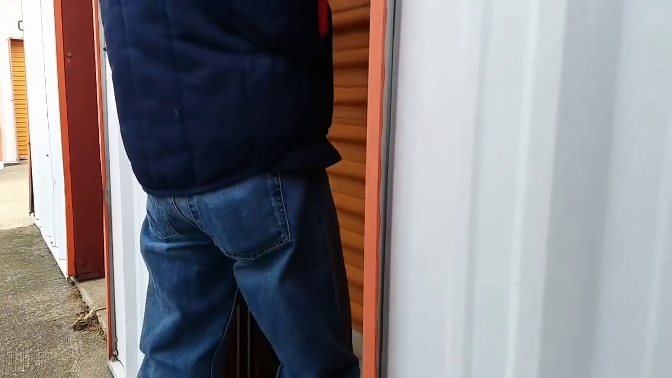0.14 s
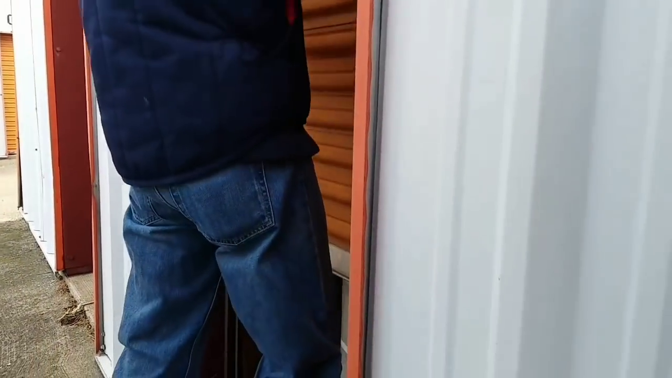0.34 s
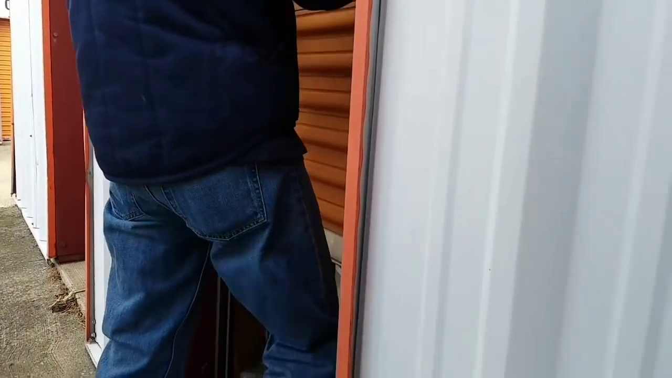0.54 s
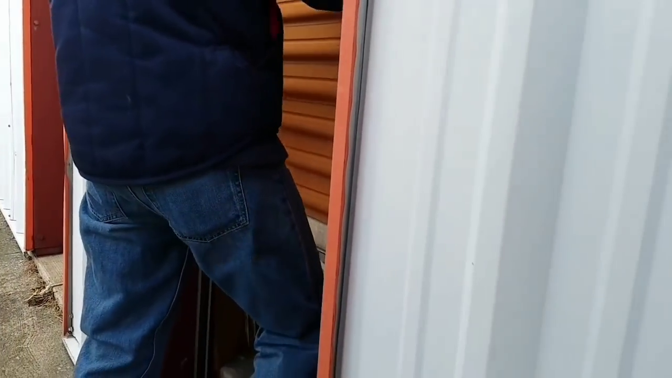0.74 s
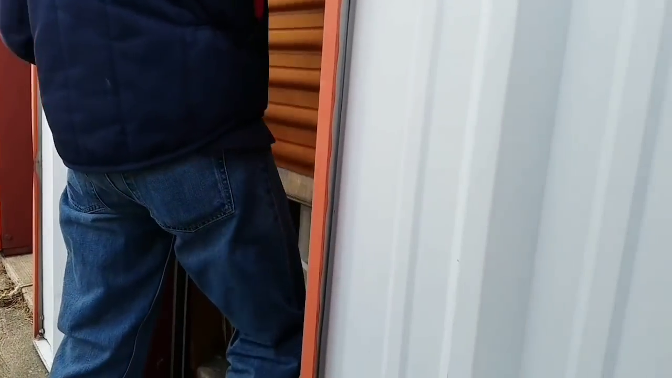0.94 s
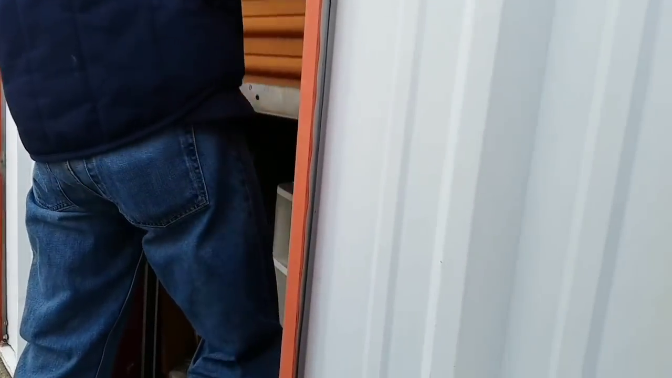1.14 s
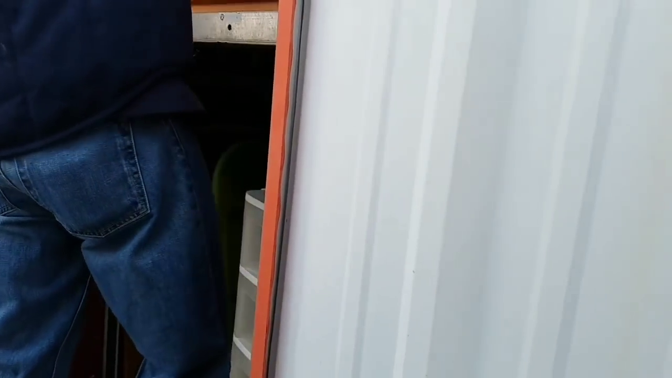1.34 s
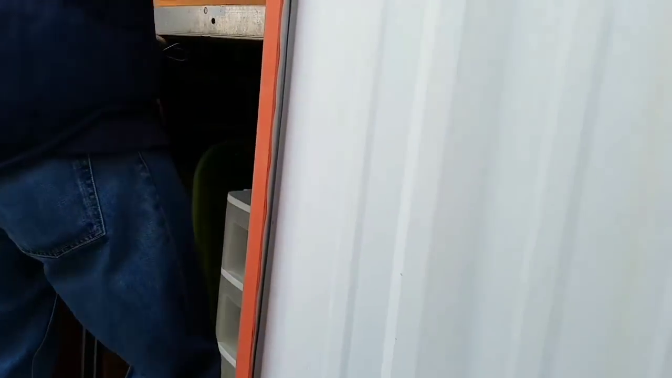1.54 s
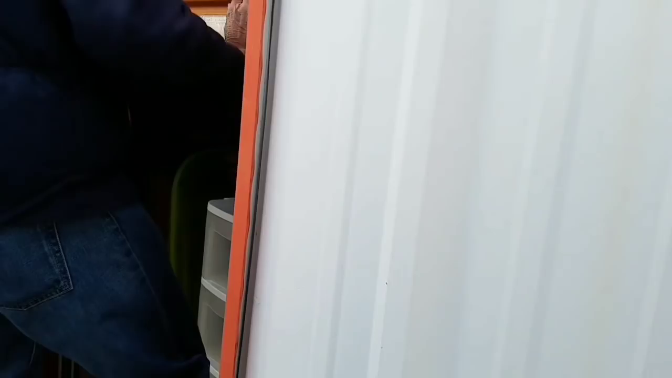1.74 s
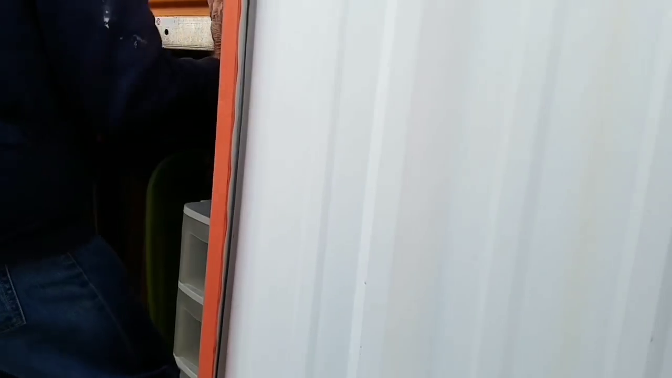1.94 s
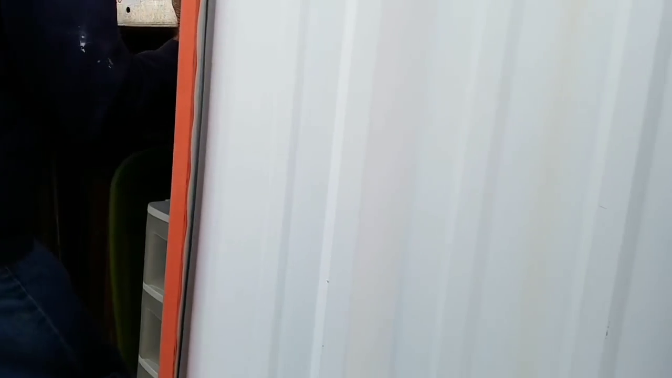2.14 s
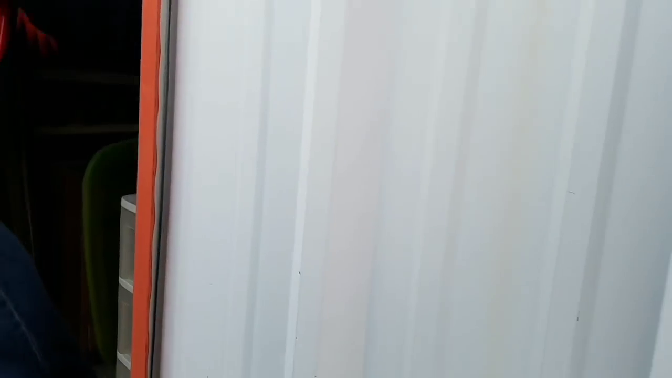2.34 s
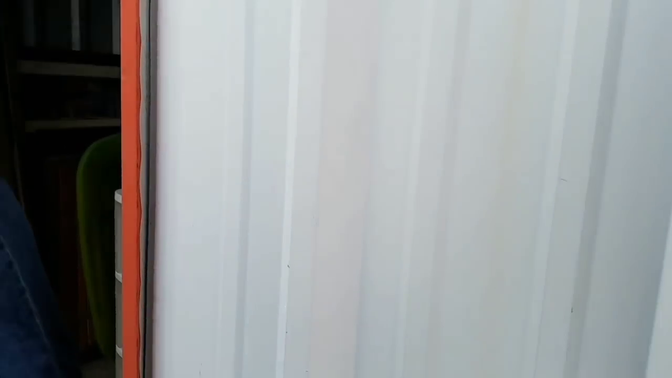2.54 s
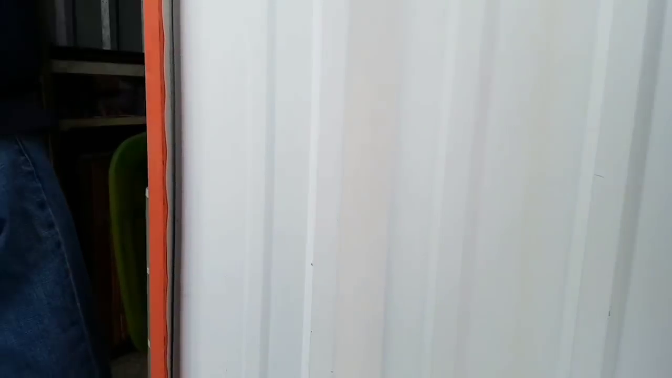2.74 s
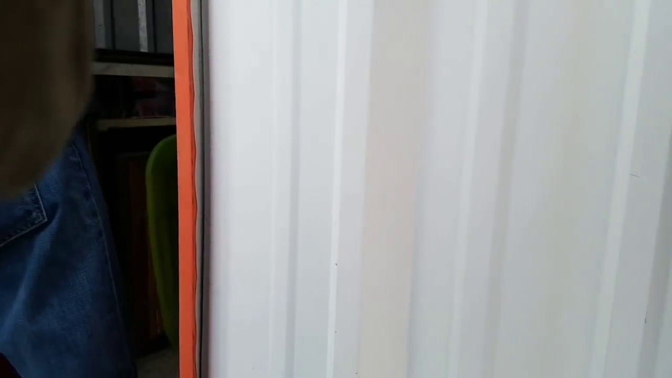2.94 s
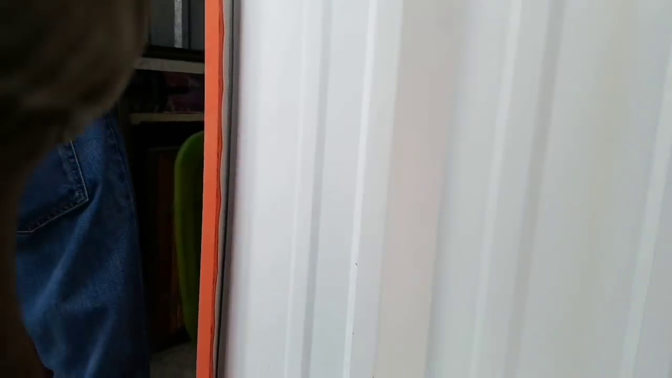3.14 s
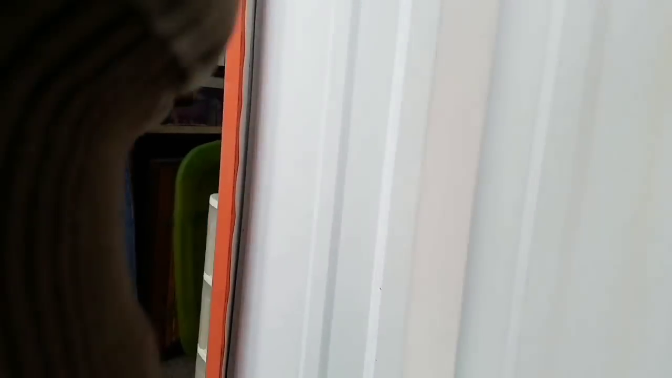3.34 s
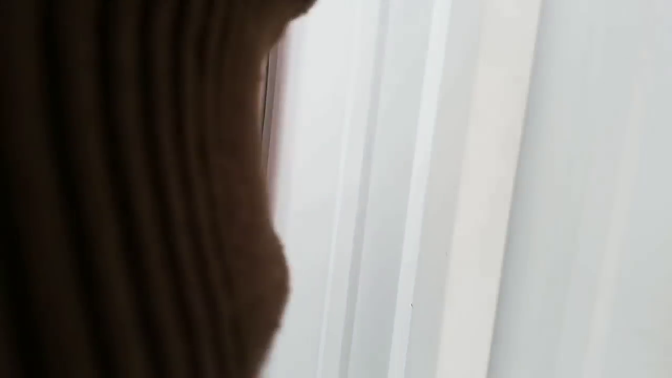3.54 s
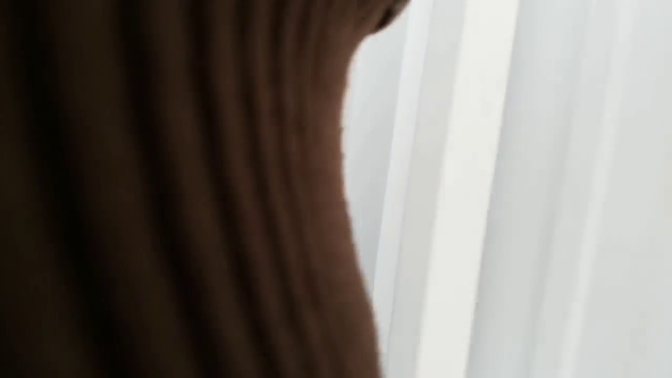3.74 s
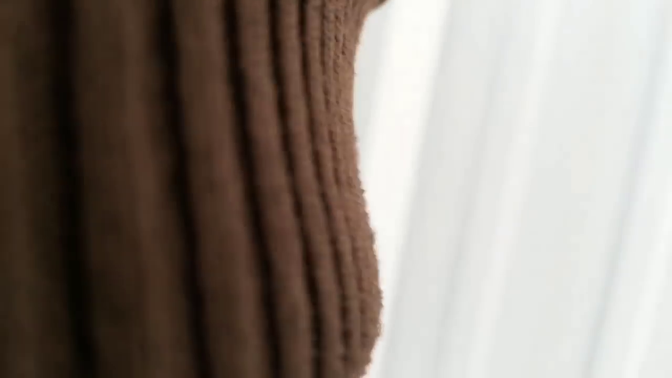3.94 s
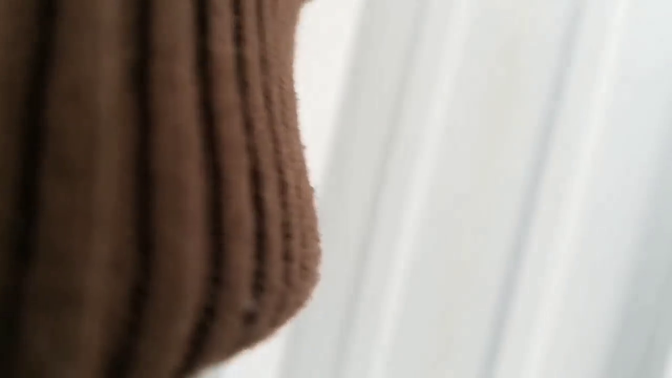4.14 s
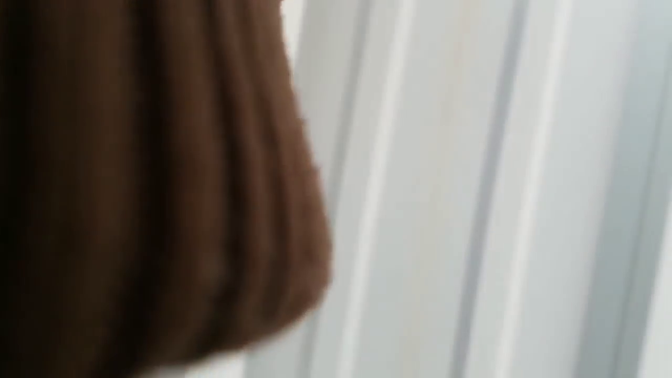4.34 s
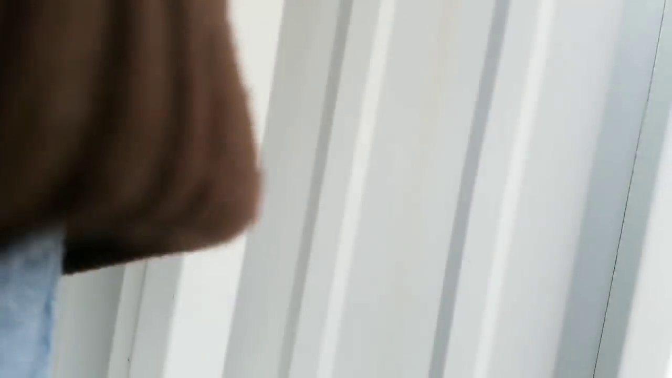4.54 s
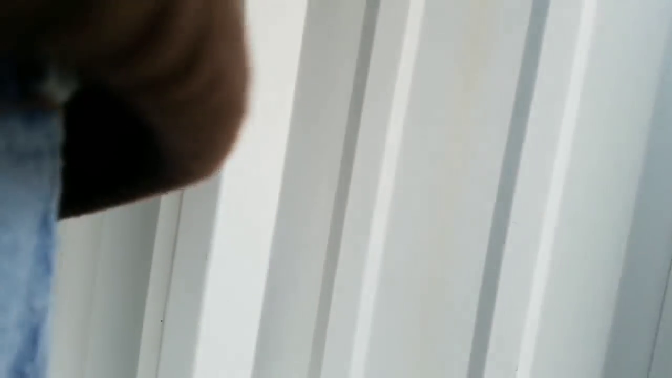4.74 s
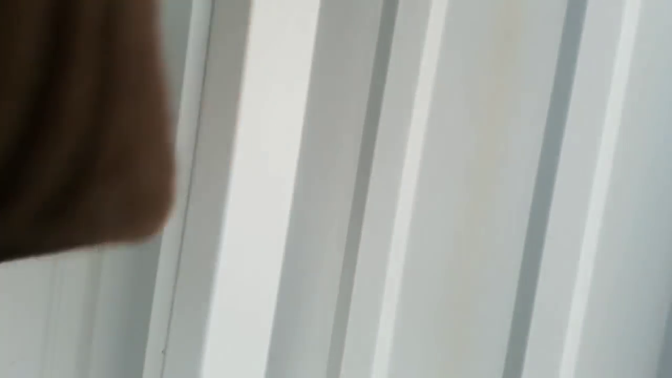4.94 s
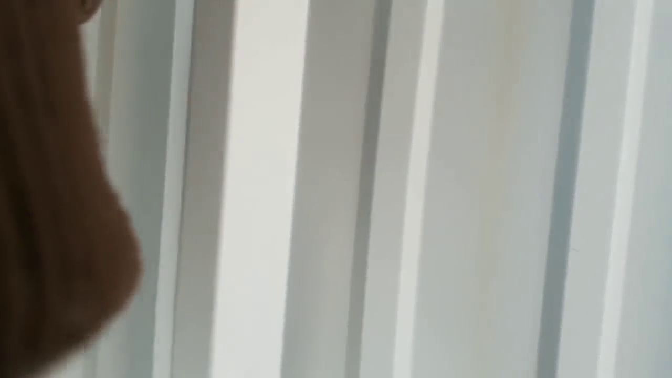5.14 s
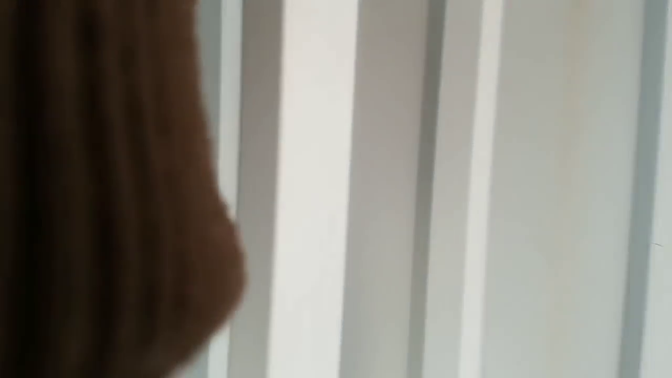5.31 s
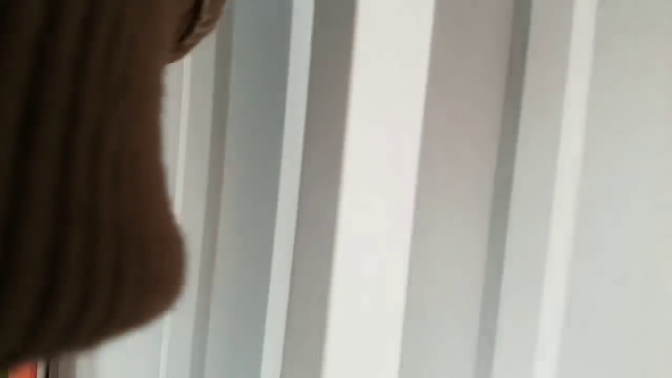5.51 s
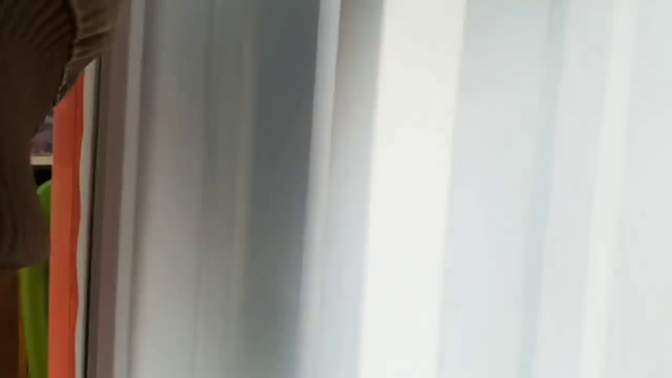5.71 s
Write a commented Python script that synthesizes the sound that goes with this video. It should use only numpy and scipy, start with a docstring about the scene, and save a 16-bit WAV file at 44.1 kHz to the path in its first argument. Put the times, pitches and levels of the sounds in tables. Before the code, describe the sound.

Loud clattering of a steel storage door being pushed open, a hard slam at the top, fading rattles, dull knocks and faint fabric crackle.

```python
"""Steel roll-up door and a knitted sleeve

A corrugated steel door is shoved up in two pushes, bangs into its coil and shudders to rest. Rib impacts
and rail friction drive banks of damped modes; throbs, soft knocks and a singing spring are decaying or
swelling sines. Then a sleeve of crackling fibres rustles close by, mostly on the left, over the low rumble
of the yard and faint air. A small two-port microphone rounds the loudest peaks."""
import sys
import numpy as np
from scipy import signal
from scipy.fft import rfft, irfft, next_fast_len
from scipy.io import wavfile
from scipy.ndimage import uniform_filter1d

SR = 44100
rng = np.random.default_rng(int(sys.argv[2]) if len(sys.argv) > 2 else 0)


def materialize(psi):
    """Save the field psi as 16-bit PCM at rate SR to the path in sys.argv[1].

    A 1-D psi becomes a single channel; in a 2-D psi each row is a channel.
    """
    bounded = np.clip(np.atleast_2d(psi).T, -1, 1)
    quanta = np.round(bounded * 32767).astype(np.int16)
    wavfile.write(sys.argv[1], SR, quanta)


N = 254456


def amp(db):
    """Decibel law: level to amplitude ratio."""
    return 10 ** (np.asarray(db) / 20)


def evened(x):
    """Power normalisation: scales to rms 1."""
    return x / np.sqrt(np.mean(x ** 2) + 1e-20)


def pan(left_over_right_db):
    """Interaural level difference: gains of left and right, half the difference each."""
    return amp(left_over_right_db * np.array([[0.5], [-0.5]]))


def read(points, hz):
    """Logarithmic pitch scale: interpolates a spectrum along log frequency."""
    f, value = np.transpose(points)
    return np.interp(np.log(hz + 1), np.log(f + 1), value)


def curves(rows):
    """Envelopes: a table's columns at every sample; the first is -120 outside its span."""
    s, level_db, *rest = np.transpose(rows)
    t = np.arange(N) / SR
    level = np.interp(t, s, level_db, left=-120, right=-120)
    return [level] + [np.interp(t, s, column) for column in rest]


def place(out, start_s, sound):
    """Superposition: adds a short sound at its start time."""
    out[:, round(start_s * SR):][:, :sound.shape[-1]] += sound


def colour(x, points, lo_hz=1., hi_hz=21700.0):
    """Linear filtering: multiplies the spectrum by a response between two soft edges."""
    size = next_fast_len(N)
    hz = np.fft.rfftfreq(size, 1 / SR) + 1
    edges = 1 / np.sqrt((1 + (lo_hz / hz) ** 6) * (1 + (hz / hi_hz) ** 6))
    return irfft(rfft(x, size) * amp(read(points, hz)) * edges, size)[..., :N]


def ring(x, modes):
    """Modal superposition: one drive excites parallel damped resonances."""
    out = 0
    for hz, width_hz, db in modes:
        r, turn = np.exp(-np.pi * width_hz / SR), 2 * np.pi * hz / SR
        resonance = signal.lfilter([1, 0, -1], [1, -2 * r * np.cos(turn), r * r], x)
        # the root makes db the gain on white noise, whatever the width
        out = out + amp(db) * np.sqrt(1 - r) * resonance
    return out


def chatter(per_s, spread_db, t60_s):
    """Shot noise: random uneven impacts gate two noises alike, held even over longer spans."""
    struck = rng.random(N) < per_s / SR
    size = amp(spread_db * np.minimum(rng.exponential(1, N), 4)) * struck
    power = signal.lfilter([1], [1, -amp(-2 * 60 / t60_s / SR)], size ** 2) + 1e-9
    power /= uniform_filter1d(power, size=3000)
    return evened(np.sqrt(power) * rng.standard_normal((2, N)))


def flex(x, patchy_db):
    """Modal detuning: as the sheet bends, narrow bands swell and fade at random."""
    z = signal.stft(x, nperseg=1024, noverlap=768)[2]
    patches = uniform_filter1d(rng.standard_normal(z.shape[1:]), size=10, axis=1)  # along time
    patches = uniform_filter1d(patches, size=2, axis=0)  # along frequency
    return signal.istft(z * amp(patchy_db * evened(patches)), nperseg=1024, noverlap=768)[1][:, :N]


def ports(pair, same, lead, wander_s, balance):
    """Spatial coherence: mixes two unrelated sounds; the shared part comes from a spot that keeps moving."""
    hz, t, (a, b) = signal.stft(pair, SR, nperseg=512, noverlap=384)
    lag_s = wander_s * evened(uniform_filter1d(rng.standard_normal(len(t)), size=60))
    likeness = np.clip(read(same, hz), 0, 1)[:, None]
    tilt = amp(read(balance, hz) / 2)[:, None]
    phase = read(lead, hz)[:, None] + 2 * np.pi * hz[:, None] * lag_s
    right = likeness * a * np.exp(-1j * phase) + np.sqrt(1 - likeness ** 2) * b
    return signal.istft(np.array([a * tilt, right / tilt]), nperseg=512, noverlap=384)[1][:, :N]


# Dense modes of the steel. Each row: frequency in Hz, relative density in dB per Hz.
STEEL_DENSITY = [(15, -48), (25, -21.5), (105, -5.5), (170, -3.5), (250, 6), (310, -6), (430, -17.5),
                 (640, -17), (1560, -19.5), (4000, -30.5), (7500, -35), (9500, -42.5), (11500, -35.5),
                 (15700, -33)]


def steel(x, lo_hz=1., hi_hz=21700.0):
    """Statistical mode density: modes too close to tell apart act as a smooth filter."""
    return colour(x, STEEL_DENSITY, lo_hz, hi_hz)


def sway_body(x):
    """Mass-like motion: the whole curtain answers only at low frequency."""
    return steel(x, hi_hz=135)


# Drum modes of the sheet. Each row: frequency in Hz, width in Hz, relative level in dB.
SHEET_MODES = [(165, 11, -1.5), (220, 5.3, -38), (213, 13, 2), (256, 9.7, 13.5), (310, 11, -74)]


def boom_body(x):
    """Plate resonance: the sheet drums in a few low modes."""
    return ring(x, SHEET_MODES) * amp(-13) + steel(x, 152, 205) * amp(26.0)


# Modes of the ribs. Each row: frequency in Hz, width in Hz, relative level in dB.
RIB_MODES = [(335, 7.5, -5.5), (384.6, 39, 0.5), (432.4, 30, 10), (467, 58, -6), (539, 26, 2),
             (572.5, 10, 0.5), (677, 10, -9), (708, 8.9, -11), (756.3, 11, -4)]


def rib_body(x):
    """Bending resonance: the corrugations ring in the low middle."""
    return ring(x, RIB_MODES) * amp(-12.5) + steel(x, 340, 1040) * amp(24.5)


# Modes of the slats. Each row: frequency in Hz, width in Hz, relative level in dB.
SLAT_MODES = [(937, 18, -4), (1050, 75, 0), (1168, 20, -4), (1280, 74, -2), (1500, 70, 1.5), (1668, 55, -3),
              (1843, 44, -2.5), (2090, 42, -9), (2450, 15, -7), (2660, 13, -11)]


def slat_body(x):
    """Bending resonance: the slats ring above the ribs."""
    return ring(x, SLAT_MODES) * amp(-15.5) + steel(x, 930, 4800) * amp(23.5)


# Modes of the guide rails. Each row: frequency in Hz, width in Hz, relative level in dB.
RAIL_MODES = [(3060, 19, -4), (4130, 62, 3), (5600, 33, -24), (5900, 30, -10), (6320, 57, 1)]


def rail_body(x):
    """Friction-driven resonance: the scraped rails ring in the treble."""
    return ring(x, RAIL_MODES) * amp(-37.5) + steel(x, 2900, 10200) * amp(16.0)


def edge_body(x):
    """High-frequency radiation: the sheet's edges fizz."""
    return steel(x, lo_hz=8100)


# Drive of the door, in lists split where the level jumps. Each row: time in seconds, drumming drive of the
# sheet in dB, scraping drive in the rails in dB.
CURTAIN_MOTION = [
    [(0.0, -24, -42.5), (0.082, -15, -33), (0.1, -17, -28.5), (0.262, -13, -28.5), (0.37, -12, -31.5),
     (0.46, -14, -24.5), (0.484, -18, -32)],
    [(0.492, -26, -42), (0.508, -25, -42), (0.522, -23, -31.5), (0.548, -16.5, -31.5),
     (0.854, -30.5, -58.5), (0.888, -30, -67), (1.015, -33, -52.5)],
    [(1.025, -33.5, -42.5), (1.081, -26, -43.5), (1.097, -22.5, -38.5), (1.545, -16, -29),
     (1.573, -15, -30), (1.673, -15, -38.5), (1.69, -11.5, -52)],
    [(1.7, -18, -55.5), (1.918, -34, -69), (2.086, -40, -60.5), (2.094, -34, -53), (2.142, -38, -71),
     (2.196, -28, -53), (2.283, -32, -55)],
    [(2.292, -20, -42), (2.328, -27.5, -37), (2.342, -21, -30.5), (2.356, -24.5, -38), (2.442, -24, -38),
     (2.458, -25, -39), (2.476, -27, -39)],
    [(2.484, -25, -25), (2.492, -19, -22), (2.512, -14.5, -33), (2.612, -19.5, -38), (2.632, -23.5, -27.5),
     (2.7, -22.5, -37), (2.71, -30, -41)],
    [(2.73, -44, -52), (2.736, -32.5, -48), (2.82, -31, -51.5), (2.876, -27.5, -40.5), (2.924, -28, -57),
     (2.976, -33.5, -44.5), (3.13, -41, -48.5)],
    [(3.14, -33, -41.5), (3.192, -26, -38.5), (3.346, -37.5, -76), (3.368, -29.5, -74), (3.494, -41, -55),
     (3.522, -49, -72), (3.555, -55, -60)],
    [(3.565, -47, -58), (3.579, -31, -50), (3.603, -24, -47.5), (3.865, -48.5, -59.5), (3.953, -56, -58),
     (3.973, -41, -52), (4.0, -53, -45)],
]
# Each row: time in seconds, how much sheet swings free (1 = door nearly shut).
FREE_SHEET = [(0, 1.02), (.5, 1.13), (.9, 1.09), (1.3, 1.07), (1.7, 1.08), (1.88, 1.34), (2.08, 1.16),
              (2.35, 0.043), (2.58, 0.51), (2.75, 0.28), (3.3, 0.28), (4.0, 0.45)]
# Thin top-treble hiss, perhaps clothing, under the later part of the door. Each row: time in seconds,
# level in dB.
THIN_HISS = [(1.7, -82), (1.95, -60), (2.0, -66), (2.1, -52), (2.7, -56), (3.3, -47.5), (3.54, -47),
             (3.57, -72), (3.85, -60), (3.95, -45)]
# Answers of sway, boom, ribs, slats, rails and edges. Each row: base level in dB, share of drumming, share of
# scraping, dB lost once coiled, jolt level in dB, share of a jolt's weight.
PART_ANSWERS = [(-11, 0.8, 0, 16, -40, .9), (-1.5, 1.064, 0.04, 6, 6, 1.0), (-2, 0.82, .15, -4.5, 0, 0.55),
                (-4, 0.42, 0.52, -3.5, 2, 0.9), (0, 0, 1.006, 3.5, 0, 0.056), (4.5, 0.024, 1.12, 1, 0, 0)]


def rolling_levels():
    """Mode coupling: each part shares in drumming and scraping, and changes as the sheet coils up."""
    base_db, drum, scrape, coiled_db = np.transpose(PART_ANSWERS)[:4, :, None]
    drum_db, scrape_db = curves(np.vstack(CURTAIN_MOTION))
    coiled = 1 - curves(FREE_SHEET)[0].clip(0)
    levels = base_db + drum * drum_db + scrape * scrape_db - coiled_db * coiled
    # the hiss adds in power to the last part
    levels[-1] = 10 * np.log10(amp(2 * levels[-1]) + amp(2 * curves(THIN_HISS)[0]))
    return levels


# Jolts. Each row: start in seconds, crack in dB, weight in dB (heavy is dull, light is bright), fizz of the
# edges in dB.
JOLT_ROWS = [(0.081, -20, 2, 10), (0.191, -15, -11, 0), (0.39, -17, -7, 9), (0.4434, -14, -12, 7),
             (0.515, -22, -1, -9), (0.559, -24.5, -10, 11), (0.6638, -23, 2, -1), (0.7523, -25, 0, -12),
             (1.0253, -24, -5, -3), (1.1414, -20, -16, 3), (1.1865, -15, -10, -5), (1.3912, -14, -1, -3),
             (1.473, -19.5, 4.5, 6), (1.7837, -38, 8, -5), (1.825, -38, 11, -5), (2.0944, -46, 6, -4),
             (2.1997, -24.5, -1, -4), (2.293, -22.5, -3, 10), (2.3371, -23, 0, -10), (2.484, -16, 7, 12.5),
             (2.538, -18, 7, -11), (2.609, -21, -15, 10), (3.149, -26.5, 0, -14), (3.3557, -45, 12, -3),
             (3.5664, -38, 9, -12), (3.6, -36, 10, -10)]
JOLT_T60_S, JOLT_RISE_S = 0.1, 0.00084


def jolt_envelopes():
    """Impulsive excitation: a quick rise and exponential decay strikes every part of the door."""
    jolt_db, heavy = np.transpose(PART_ANSWERS)[4:, :, None]
    edges = np.arange(6)[:, None] == 5  # only the last part fizzes
    blows, t = np.zeros((6, N)), np.arange(SR // 2) / SR
    for start_s, db, weight_db, fizz_db in JOLT_ROWS:
        level_db = db + jolt_db + heavy * weight_db + edges * fizz_db
        place(blows, start_s, amp(level_db - 60 * t / JOLT_T60_S) * np.minimum(t / JOLT_RISE_S, 1))
    return blows


# Each row: frequency in Hz, left-right likeness from 0 to 1.
DOOR_LIKENESS = [(30, 0.44), (60, 0.85), (150, 1), (380, 0.91), (950, 0.66), (2400, 0.42), (6000, 0.35),
                 (15000, 0.8)]
# Each row: frequency in Hz, left over right in dB.
DOOR_LEFT_RIGHT = [(60, -0.5), (180, -2.9), (550, 0.4), (1650, 0.3), (4970, -3), (15000, 3)]
# A pair: rows of frequency in Hz and radians the left port leads; then the rms wander of arrival in seconds.
DOOR_PHASE = [(30, 0.5), (250, -0.2), (600, 0.79), (1460, -1.12), (2070, 0.56), (3880, 0.94),
              (16000, 1.56)], .00006


def door():
    """Source and resonator: rib impacts, rail scraping and jolts drive the six parts of the door."""
    moving = np.arange(N) < CURTAIN_MOTION[-1][-1][0] * SR
    ribs, rails, hiss = chatter(600, 2.2, 0.11), chatter(500, 0.91, 0.18), chatter(540, 1.5, 0.058)
    crack = rng.standard_normal((2, N))
    sway = rng.standard_normal((2, N))  # the big slow modes average over many impacts
    parts = [(sway_body, sway),
             (boom_body, sway + 0.44 * ribs),
             (rib_body, ribs),
             (slat_body, flex(0.36 * ribs + 0.7 * rails, 1.16)),
             (rail_body, flex(rails, 4.2)),
             (edge_body, flex(0.5 * rails + 0.46 * hiss, 3.3))]
    out = 0
    for (body, drive), level_db, blow in zip(parts, rolling_levels(), jolt_envelopes()):
        rolling = body(drive)
        # the level curve is applied after the modes, so the rolling noise can drop at once; jolts ring freely
        rolled = moving * amp(level_db) * rolling
        struck = amp(-12.5) * body(blow * crack)
        out = out + (rolled + struck) / np.std(rolling)
    lead, wander_s = DOOR_PHASE
    return ports(out, DOOR_LIKENESS, lead, wander_s, DOOR_LEFT_RIGHT)


# Each row: frequency in Hz, relative density in dB per Hz.
AIR_SPECTRUM = [(180, 1), (300, 2.5), (455, 5), (667, -2), (2170, -11.5), (7000, -26.5), (9400, -39),
                (12000, -23), (15700, -17.5)]
AIR_DB = -46  # rms level


def air():
    """Diffuse field: faint steady noise, almost unrelated at the two ports."""
    noise = rng.standard_normal((2, N))
    return amp(AIR_DB) * evened(colour(noise + 0.047 * noise[::-1], AIR_SPECTRUM))


SWELL = 0.7  # exponent; under 1 a tone swells quickly and holds


def wavering_tones(rows, sag_hz_per_s=0):
    """Frequency and amplitude modulation: sines swell and fade with a random waver."""
    t, out = np.arange(N) / SR, 0
    waver = evened(uniform_filter1d(rng.standard_normal((2, N)), size=900))
    for start_s, length_s, hz, db in rows:
        age = np.clip(t - start_s, 0, length_s)
        pitch = hz * (1 + 0.012 * waver[1]) - sag_hz_per_s * age
        swell = abs(np.sin(np.pi * age / length_s)) ** SWELL * (age < length_s)
        out = out + np.sqrt(2) * amp(db) * swell * np.sin(2 * np.pi * np.cumsum(pitch) / SR)
    return out * (1 + 0.45 * waver[0])


# Each row: start in seconds, length in seconds, mean frequency in Hz, level in dB.
SETTLING_THROBS = [(1.863, .055, 112, -24), (1.925, 0.056, 100, -30.5), (2.02, 0.061, 88, -33)]


def settling():
    """Low-frequency oscillation: the sheet throbs as it swings out, each throb deeper."""
    return wavering_tones(SETTLING_THROBS)


# Each row: start in seconds, level in dB, frequency in Hz, edge noise in dB relative to the ring.
KNOCK_ROWS = [(2.095, -19.5, 245, -26), (2.097, -32, 1205, -16), (3.564, -17, 822, -20),
              (3.573, -18, 226, -30), (3.579, -19, 803, -20), (3.63, -21, 770, -12),
              (3.737, -24.5, 480, -27), (3.884, -26, 422, -18), (3.969, -27, 329, -25),
              (4.099, -35, 456, -20), (4.352, -28, 415, -17), (4.409, -27.5, 364, -22),
              (4.523, -26, 380, -8), (4.649, -17, 461, -22), (4.665, -22.5, 506, -17),
              (4.674, -26, 408, -15), (4.778, -24.5, 193, -17), (4.783, -26, 1090, -2),
              (4.971, -26.5, 245, -24)]
KNOCK_T60_S, KNOCK_DAMP = 0.051, 0.28  # ring at 400 Hz; higher knocks die sooner by this power of pitch


def knocks():
    """Damped free vibration: two partials ring dully with a puff of noise at the edge."""
    out, t = np.zeros((2, N + SR)), np.arange(SR // 5) / SR
    band = signal.butter(2, [500, 3500], "band", fs=SR, output="sos")
    for start_s, db, hz, edge_db in KNOCK_ROWS:
        puff = evened(signal.sosfilt(band, rng.standard_normal(len(t))))
        partials = np.sin(2 * np.pi * hz * t) + 0.46 * np.sin(2 * np.pi * 1.3 * hz * t)
        decay_db = 60 * t / KNOCK_T60_S * (hz / 400) ** KNOCK_DAMP
        envelope = amp(db - decay_db) * np.minimum(t / 0.0043, 1)
        place(out, start_s, envelope * (partials + amp(edge_db) * puff))
    return out[:, :N]


# Each row: start in seconds, length in seconds, mean starting frequency in Hz, level in dB.
COIL_TONES = [(2.493, 0.24, 790, -30.5), (2.73, .11, 810, -35), (2.88, 0.13, 813, -39.5)]
SAG_HZ_PER_S = 258


def coil_spring():
    """Spring resonance: the drum spring sings after the slam, its note sinking while it rings."""
    return wavering_tones(COIL_TONES, SAG_HZ_PER_S)


# One row: start in seconds, level in dB, lower frequency in Hz, length in seconds, left over right in dB.
LATCH_SQUEAK = (2.717, -27, 5780, .010, -5)


def latch():
    """Beating partials: two close high tones and noise make the latch's brief squeak."""
    out, t = np.zeros((2, N + SR)), np.arange(SR // 5) / SR
    start_s, db, hz, length_s, pan_db = LATCH_SQUEAK
    squeak = np.sin(2 * np.pi * hz * t) + 0.5 * np.sin(2 * np.pi * 1.11 * hz * t)
    squeak = squeak + 0.29 * rng.standard_normal(len(t))
    envelope = np.sin(np.pi * np.minimum(t / length_s, 1)) ** 2
    place(out, start_s, amp(db) * pan(pan_db) * envelope * squeak)
    return out[:, :N]


# Each row: time in seconds, rms level in dB.
RUMBLE_LEVEL = [(3.4, -50), (3.9, -52), (4.45, -49.5), (4.53, -39), (4.75, -47), (4.98, -45.5),
                (5.17, -49.5), (5.38, -40.5), (5.77, -37)]
# Each row: frequency in Hz, relative density in dB per Hz.
YARD_SPECTRUM = [(12, -42), (20, -10), (206, 0.5), (280, -10), (303, -8), (381, -18.5), (594, -33),
                 (749, -21), (1080, -33), (2000, -68), (2600, -70), (4400, -120)]


def yard_rumble():
    """Long-wavelength coherence: low noise reaches both ports nearly alike."""
    low = rng.standard_normal((2, N))
    return amp(curves(RUMBLE_LEVEL)[0]) * evened(colour(low + 0.68 * low[::-1], YARD_SPECTRUM))


# Each row: start in seconds, level in dB, left over right in dB.
THREAD_SNAPS = [(3.5453, -34, -2.5), (3.8092, -38, -2.0), (4.2914, -29, 11.5), (4.3231, -25, 9.5),
                (4.3475, -26, 8.0), (4.3794, -21, 11.5), (4.4734, -37, 2.5), (4.5186, -29, 2.0),
                (4.995, -28, 8.0), (5.1694, -29, 6.0), (5.2184, -39, 8.0), (5.7039, -29, -7.5)]
SNAP_S = .00006


def threads():
    """Impulse radiation: each thread snaps as a pulse that swings once below zero and dies."""
    out, t = np.zeros((2, N + SR)), np.arange(SR // 5) / SR
    snap = (1 - t / SNAP_S) * np.exp(-t / SNAP_S)
    for start_s, db, pan_db in THREAD_SNAPS:
        place(out, start_s, amp(db) * pan(pan_db) * snap)
    return out[:, :N]


# Each row: time in seconds, rustle in dB, body of the wool in dB relative to the rustle.
SLEEVE_LEVELS = [(3.85, -63, 14), (3.924, -49.5, -20), (3.966, -45.5, -3), (4.26, -46.5, 1),
                 (4.272, -47, -2.5), (4.5, -48, 7), (4.522, -39.5, 1.5), (4.736, -49.5, 4.5),
                 (4.768, -46.5, -5), (4.784, -44.5, 10), (4.832, -46.5, -2), (5.168, -43.5, -3),
                 (5.302, -60, 2), (5.404, -47.5, -2), (5.51, -51.5, 8), (5.596, -45, -1.5), (5.638, -58, 7),
                 (5.77, -54.5, -6)]
# Each row: time in seconds, left over right in dB.
SLEEVE_PAN = [(3.85, 5), (4.15, 14), (4.5, 6), (4.9, 13.5), (5.2, 12), (5.4, -4), (5.6, 9), (5.77, -15)]
# Each row: frequency in Hz, relative density in dB per Hz.
WOOL_SPECTRUM = [(300, 0.5), (430, -2.5), (600, -9.5), (814, -11.5), (2280, -17), (4830, -20), (7500, -20),
                 (9700, -23), (11500, -20.5), (15700, -20.5)]


def sleeve():
    """Shot noise of friction: wool fibres crackle finely, almost unrelated at the two ports."""
    rustle_db, body_db = curves(SLEEVE_LEVELS)
    pan_db = np.interp(np.arange(N) / SR, *np.transpose(SLEEVE_PAN))
    left, right = chatter(700, 0.83, 0.1)
    # the shared part reaches the left port later, by 12 samples
    fibres = np.array([left + 0.12 * np.roll(right, 12), right])
    rustle = evened(colour(fibres, WOOL_SPECTRUM, lo_hz=2390))
    body = evened(colour(fibres, WOOL_SPECTRUM, 450, 2070))
    return (rustle + amp(body_db) * body) * amp(rustle_db) * pan(pan_db)


# Each row: start in seconds, length in seconds, mean frequency in Hz, level in dB.
DRONE_TONES = [(4.472, 0.26, 123.5, -41.5)]


def drone():
    """Tonal source: one brief, low, wavering sine."""
    return wavering_tones(DRONE_TONES)


def scene():
    """Linear superposition: the pressures of all sources add."""
    metal = door() + settling() + coil_spring() + latch()
    cloth = threads() + sleeve()
    return metal + cloth + knocks() + drone() + yard_rumble() + air()


def record(dry):
    """Soft saturation: the microphone rounds the loudest peaks; then a low-pass at 15800 Hz."""
    soft = .9 * np.tanh(dry / .9)
    lowpass = signal.firwin(511, 15800, window=("kaiser", 9), fs=SR)
    return signal.oaconvolve(soft, lowpass[None], "same")


dry = scene()
out = record(dry)
materialize(out)
```